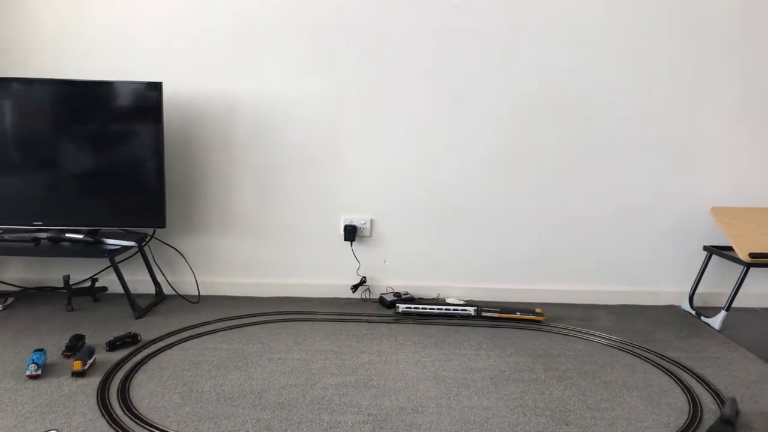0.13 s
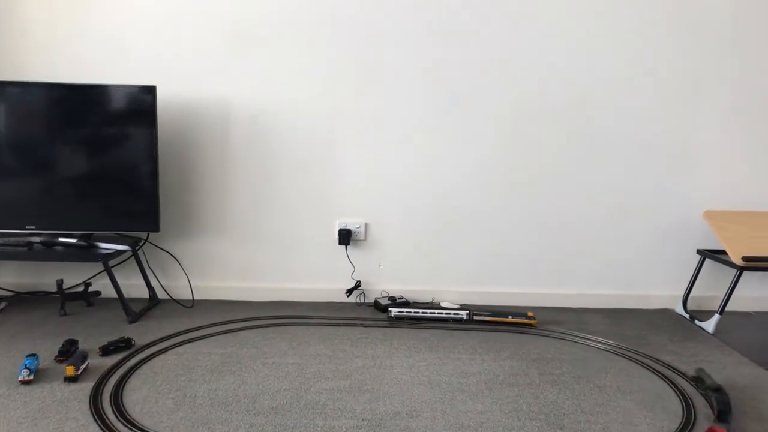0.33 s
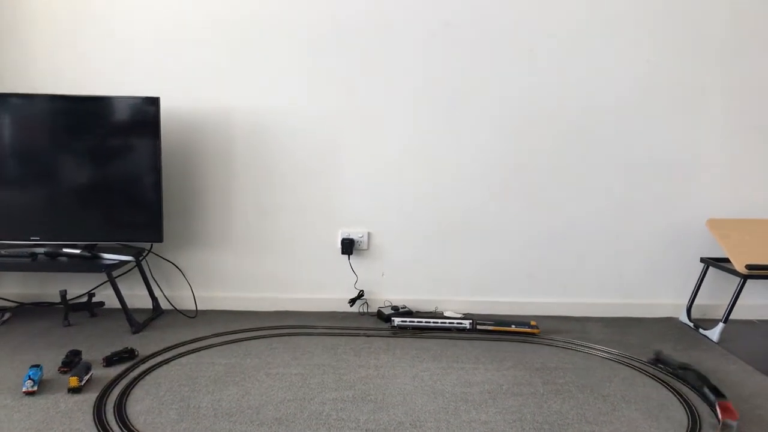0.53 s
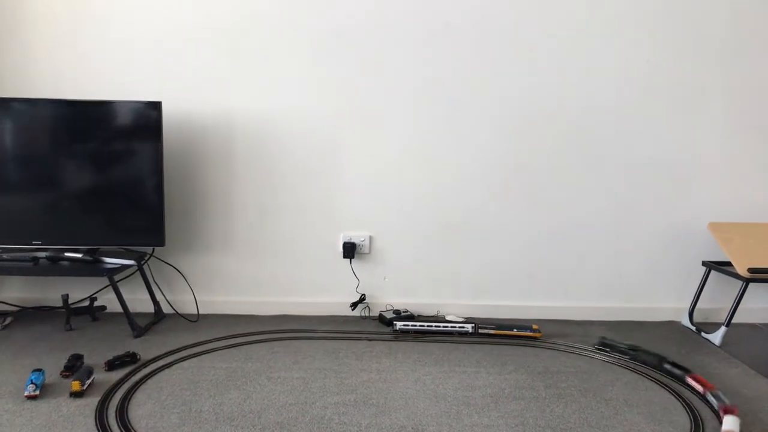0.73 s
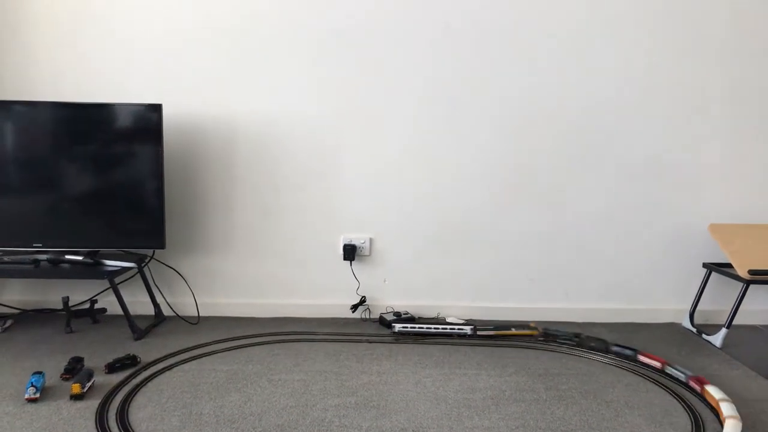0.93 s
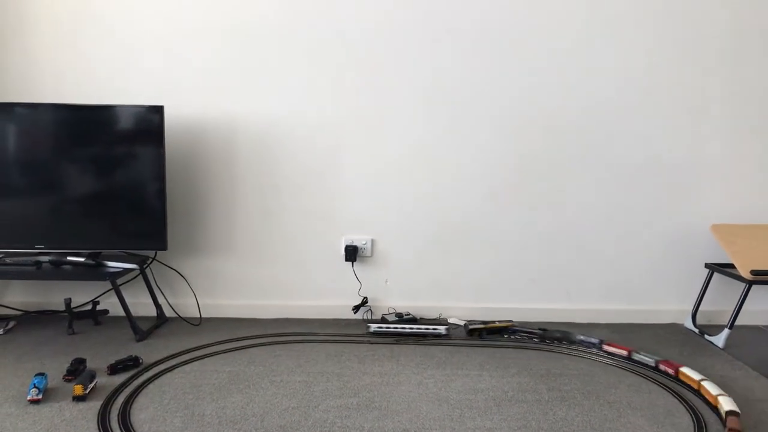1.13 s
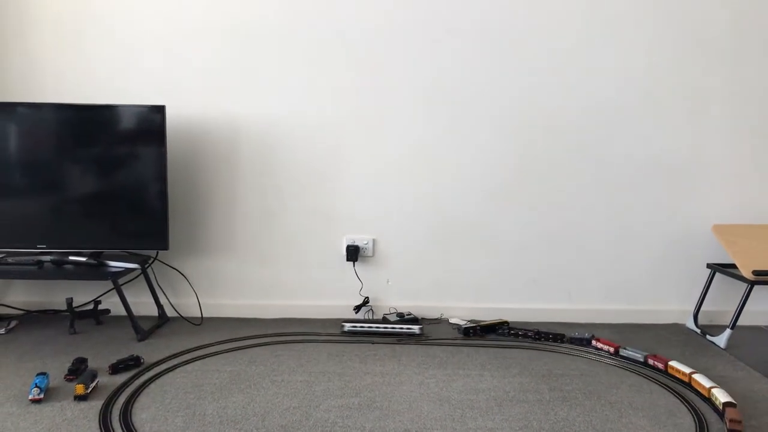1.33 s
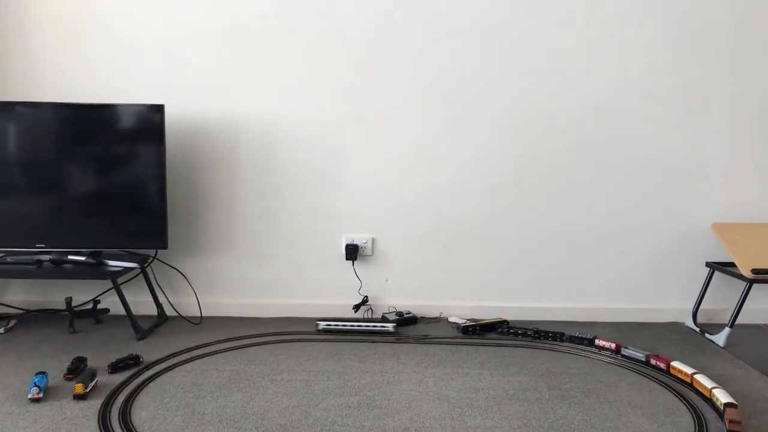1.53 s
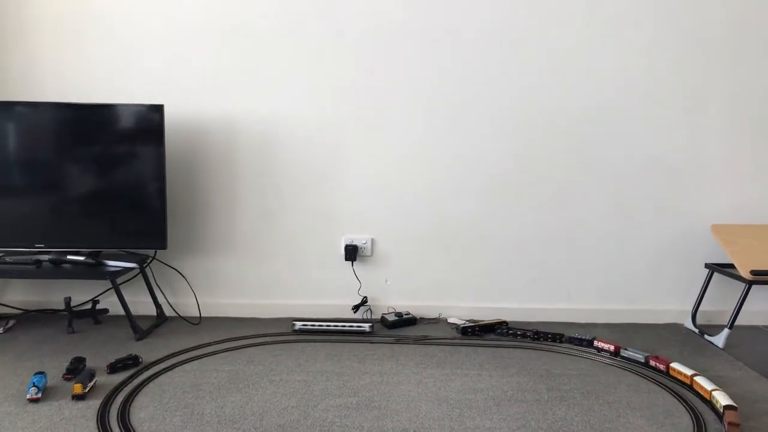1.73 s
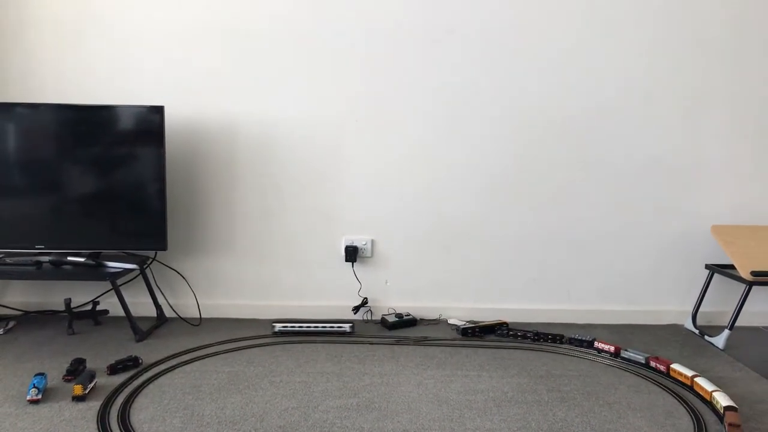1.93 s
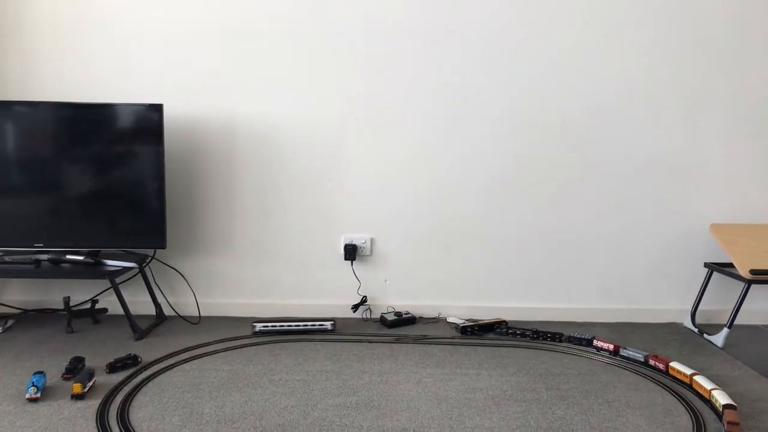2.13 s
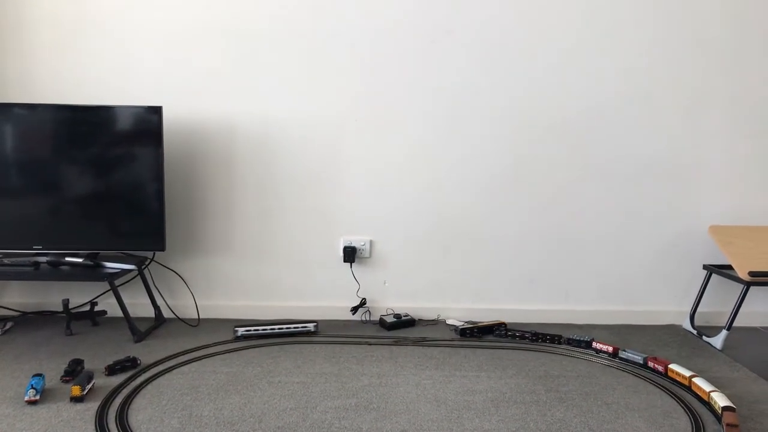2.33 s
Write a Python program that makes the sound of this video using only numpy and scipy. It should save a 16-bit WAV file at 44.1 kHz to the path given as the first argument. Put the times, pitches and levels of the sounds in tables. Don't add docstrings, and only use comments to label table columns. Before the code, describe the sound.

Toy electric train whirrs along plastic track, then crashes into parked wagons and clatters to a stop

```python
import sys
import numpy as np
from scipy import signal
from scipy.fft import rfft, irfft
from scipy.io import wavfile
from scipy.ndimage import uniform_filter1d

SR = 44100
rng = np.random.default_rng(int(sys.argv[2]) if len(sys.argv) > 2 else 0)


def generate_wav(signal):
    frames = np.transpose(np.atleast_2d(signal))
    scaled = np.clip(frames, -1, 1) * 32767
    pcm = np.round(scaled).astype(np.int16)
    wavfile.write(sys.argv[1], SR, pcm)


def invert_db(level):
    return 10 ** (np.asarray(level, dtype=float) / 20)


N = 105840

# frequency in Hz, density in dB per Hz.
HUM_COLOUR = [(30, -16), (60, 1), (97, 2.5), (290, -2.5), (420, -12.5), (650, -8.5), (1400, -20.5),
              (3000, -36)]
HUM_DB, HUM_FLICKER_DB = -59.5, 1.0
# frequency in Hz, density in dB per Hz.
HISS_COLOUR = [(1000, 1), (3000, -4.5), (5000, -9.5), (6500, -7), (8500, -1), (10500, -5), (15500, -17)]
HISS_DB, HISS_FADE_DB_PER_S = -64.5, -5

# start in seconds, level in dB, length in seconds.
SETTLE_EVENTS = [
    (1.571, -56.5, 0.022),
    (1.621, -65, 0.013),
    (1.65, -58.5, .018),
    (1.745, -67, .015),
    (1.9, -61, .01),
    (2.13, -66, 0.023),
    (2.232, -58, 0.013),
    (2.268, -79, 0.0097),
]
# frequency in Hz, density in dB per Hz.
SETTLE_COLOUR = [(500, 5), (2000, 1.5), (4500, -16), (8500, 3.5), (11000, -1), (15500, -6)]

# time in seconds, level in dB.
SCRAPE_LEVEL = [
    (.928, -72),
    (.935, -31),
    (1.0, -36.5),
    (1.1, -36.5),
    (1.17, -42.5),
    (1.24, -37),
    (1.31, -47),
    (1.42, -49),
    (1.52, -63.5),
    (1.62, -59),
]
# frequency in Hz, density in dB per Hz.
SCRAPE_COLOUR = [(120, -40.5), (200, -11), (702, -5.5), (783, -14.5), (992, -0.5), (1280, -6), (5390, -8.5),
                 (8350, -5), (15500, -23)]
RATTLE_PER_S, RATTLE_SPREAD_DB = 5000, 4.5

# start in seconds, peak in dB, length in seconds.
CRACK_EVENTS = [(0.9284, -14, 0.0061), (0.9404, -13.5, 0.004), (0.951, -21, 0.0076), (0.977, -23, 0.0033),
                (1.005, -19, 0.0054), (1.025, -18, .005), (1.036, -25, 0.0036), (1.105, -35, .004),
                (1.194, -22.5, 0.0057), (1.206, -24, 0.0033), (1.215, -46, 0.0055), (1.228, -19, 0.0037),
                (1.248, -24, 0.002), (1.3224, -23.5, 0.0046), (1.331, -20, .004), (1.339, -24, 0.0049),
                (1.397, -29.5, .006)]
# frequency in Hz, density in dB per Hz.
CRACK_COLOUR = [(200, -63), (500, -11), (1200, -15), (2500, -7.5), (4000, -18.5), (6500, -5.5), (9200, 1),
                (15500, -16)]
CRACK_DB = -8.5

# start in seconds, peak in dB, shell pitch in Hz, second pitch in Hz.
KNOCK_EVENTS = [(0.9308, -31.5, 1020, 570), (.939, -26, 1028, 1527), (.946, -32.5, 1587, 560),
                (.978, -43, 930, 2400), (1.009, -33, 980, 644), (1.013, -33.5, 530, 1028),
                (1.035, -31, 1080, 1530), (1.060, -32.5, 1100, 820), (1.075, -30.5, 640, 705),
                (1.082, -29.5, 970, 1136), (1.11, -36.5, 868, 2800), (1.144, -37.5, 972, 720),
                (1.218, -37.5, 1740, 2680), (1.259, -38, 1470, 990), (1.275, -37, 1427, 1000),
                (1.298, -38.5, 2540, 1010), (1.313, -37.5, 930, 858), (1.395, -45.5, 3464, 2390),
                (1.41, -53, 3440, 2460), (1.441, -49, 3350, 2470), (1.58, -57.5, 3220, 1510),
                (1.599, -58, 3400, 2410), (2.229, -64, 2920, 1410)]
# frequency in Hz, gain in dB.
CLACK_COLOUR = [(150, -46), (450, -1), (700, 6), (1500, 9), (2500, 13), (5000, -24), (9000, -30)]
SHELL_T60_S, CHATTER_S = 0.041, 0.0016
SECOND_PITCH_DB, CLACK_DB = -4, 0
THUD_HZ, THUD_DB, THUD_T60_S = 198, -16, 0.048

# time in seconds, level in dB.
ROLL_LEVEL = [
    (0, -38.5),
    (.2, -38.5),
    (.45, -39),
    (.7, -39),
    (.92, -40),
    (1.0, -37.5),
    (1.3, -42.5),
    (1.45, -55),
    (1.56, -94),
]
# frequency in Hz, density in dB per Hz.
ROLL_COLOUR = [(150, -15.5), (300, 1), (430, -2.5), (1500, -7), (2600, 1), (4500, -5.5), (8300, 0.5),
               (15500, -8.5)]
# frequency in Hz, width in Hz, level in dB.
BODY_MODES = [(340, 135, 8), (600, 20, -26), (640, 57, 0.5), (1240, 39, -35), (1282, 23, 1),
              (1870, 270, 8.5), (2320, 58, -46), (2320, 130, 13), (2540, 57, -4), (2720, 124, 8.5),
              (3135, 750, 6.5)]
BODY_DB, TICKS_PER_S, TICK_SPREAD_DB = -12.5, 9000, 1
WHEEL_HZ, WHEEL_DB = 7.1, 0

ROOM_LOW_T60_S, ROOM_TOP_T60_S, ROOM_DB, ROOM_GAP_S = .45, .4, -6, .005

# frequency in Hz, gain in dB.
CLOSED_COLOUR = [(1500, 0), (2700, -3.5), (4500, -0.5), (5700, 0.5), (6400, -11.5), (8400, -16),
                 (11000, -8.5), (15000, -10.5)]
OPENS_S = 0.215
# frequency in Hz, gain in dB.
PORT_COLOUR = [(5600, -1), (6600, 0.5), (7600, 3), (9400, 3), (10200, -1.5), (12000, 2.5)]
# centre in seconds, low edge in Hz, high edge in Hz, level in dB.
SPLIT_EVENTS = [
    (.27, 10600, 12900, -52),
    (.432, 6900, 8400, -48),
    (.432, 8900, 10200, -51),
    (.432, 12400, 13800, -56),
    (0.619, 7760, 8700, -47),
    (.618, 10200, 11700, -56),
    (.618, 14500, 15700, -60),
]
SPLIT_S = .046


def level(x, db):
    return x * invert_db(db) / np.sqrt(np.mean(x ** 2) + 1e-30)


def curve(rows):
    time_s, db = np.array(rows).T
    return invert_db(np.interp(np.arange(N) / SR, time_s, db, right=-140))


def colour(x, points):
    hz, db = np.array(points, float).T
    log_hz = np.log(np.arange(2049) * SR / 4096 + 1)
    cepstrum = irfft(np.interp(log_hz, np.log(hz), db) * np.log(10) / 20)
    cepstrum[1:2048] *= 2
    cepstrum[2049:] = 0
    impulse = irfft(np.exp(rfft(cepstrum)))
    return signal.fftconvolve(x, impulse)[:len(x)]


def ring(x, hz, t60_s):
    radius = np.exp(-np.log(1000) / (max(t60_s, .002) * SR))
    w = 2 * np.pi * hz / SR
    return signal.lfilter([np.sin(w)], [1, -2 * radius * np.cos(w), radius * radius], x)


def walk(rate_hz):
    hold = int(SR / rate_hz)
    steps = np.repeat(rng.standard_normal(N // hold + 1), hold)
    w = uniform_filter1d(uniform_filter1d(steps, hold), hold)[:N]
    return w / w.std()


def ticks(per_s, spread_db):
    chance, sign, draw = rng.random((3, N))
    size = np.minimum(-np.log(draw + 1e-9), 3.5)
    return (chance < per_s / SR) * np.sign(sign - .5) * invert_db(spread_db * size)


def burst(start_s, length_s, attack_s):
    t = np.maximum(np.arange(N) / SR - start_s, 0)
    return (1 - np.exp(-t / attack_s)) * np.exp(-t / max(length_s, .001))


def air():
    hum = colour(rng.standard_normal(N), HUM_COLOUR + [(8000, -83)])
    flickering = 0
    for hz in 20 * 2. ** np.arange(9):
        octave = signal.butter(2, [hz, 2 * hz], "band", fs=SR, output="sos")
        flickering = flickering + signal.sosfilt(octave, hum) * invert_db(HUM_FLICKER_DB * walk(9))
    hiss = level(colour(rng.standard_normal(N), [(300, -27)] + HISS_COLOUR), HISS_DB)
    fade = invert_db(HISS_FADE_DB_PER_S * (np.arange(N) / SR - 2))
    return level(flickering, HUM_DB) + hiss * fade


def settling():
    env = sum(invert_db(db) * burst(s, length_s, 0.0059) for s, db, length_s in SETTLE_EVENTS)
    return level(colour(ticks(5400, 4.3), SETTLE_COLOUR), 5.6) * env


def scraping():
    rattle = level(ticks(RATTLE_PER_S, RATTLE_SPREAD_DB), 0)
    rough = rattle + 0.96 * rng.standard_normal(N)
    coloured = level(colour(rough, [(50, -70)] + SCRAPE_COLOUR), 0)
    return coloured * invert_db(0.7 * walk(51.2)) * curve(SCRAPE_LEVEL)


def cracks():
    env = sum(invert_db(db) * burst(s, length_s, .0007) for s, db, length_s in CRACK_EVENTS)
    return level(colour(rng.standard_normal(N), CRACK_COLOUR), CRACK_DB) * env


def peak_one(x):
    return x / np.abs(x).max()


def soft_ring(x, hz, t60_s):
    return peak_one(ring(ring(x, hz, t60_s), hz, .005))


def knocks():
    out = np.zeros(N)
    t = np.arange(SR // 5) / SR
    thin = signal.butter(4, 450, "high", fs=SR, output="sos")
    for start_s, db, shell_hz, second_hz in KNOCK_EVENTS:
        chatter = rng.standard_normal(len(t)) * np.exp(-t / CHATTER_S)
        shell = soft_ring(chatter, shell_hz, SHELL_T60_S)
        second = invert_db(SECOND_PITCH_DB) * soft_ring(chatter, second_hz, SHELL_T60_S)
        clack = invert_db(CLACK_DB) * peak_one(colour(chatter, CLACK_COLOUR))
        thud = invert_db(THUD_DB) * soft_ring(chatter, THUD_HZ, THUD_T60_S)
        knock = signal.sosfilt(thin, shell + second + clack) + thud
        i = int(start_s * SR)
        out[i:i + len(knock)] += invert_db(db) * knock[:N - i]
    return out


def rolling():
    gear = ticks(TICKS_PER_S, TICK_SPREAD_DB)
    body = 0
    for hz, width_hz, db in BODY_MODES:
        mode = level(ring(gear, hz, 3.35 / width_hz), db)
        body = body + mode * invert_db(2.0 * walk(13.1))
    wheel = WHEEL_DB * np.sin(2 * np.pi * WHEEL_HZ * np.arange(N) / SR)
    throb = invert_db(wheel + 0.36 * walk(38.6))
    broad = level(colour(gear, [(50, -30)] + ROLL_COLOUR), 0)
    return level(broad + level(body, BODY_DB), 0) * throb * curve(ROLL_LEVEL)


def room(x):
    t = np.arange(SR // 2) / SR
    noise = rng.standard_normal(len(t))
    lows = signal.sosfilt(signal.butter(1, 3000, fs=SR, output="sos"), noise)
    tail = lows * invert_db(-60 * t / ROOM_LOW_T60_S) + (noise - lows) * invert_db(-60 * t / ROOM_TOP_T60_S)
    tail = tail * (t > ROOM_GAP_S)
    return x + invert_db(ROOM_DB) * signal.fftconvolve(x, tail / np.sqrt(np.sum(tail ** 2)))[:N]


def scene():
    crash = scraping() + cracks() + knocks() + settling()
    mono = air() + room(crash) + rolling()
    return np.array([mono, mono])


def splits():
    t = np.arange(N) / SR
    out = 0
    for centre_s, low_hz, high_hz, db in SPLIT_EVENTS:
        sos = signal.butter(6, [low_hz, high_hz], "band", fs=SR, output="sos")
        band = level(signal.sosfilt(sos, rng.standard_normal(N)), db)
        out = out + band * np.cos(np.pi * np.clip((t - centre_s) / SPLIT_S, -.5, .5))
    return out


def band_limit(x):
    return signal.sosfilt(signal.butter(12, 15910, fs=SR, output="sos"), x)


def record(dry):
    opened = np.clip((np.arange(N) / SR - OPENS_S) / .004, 0, 1)
    bass_cut = signal.butter(2, 55, "high", fs=SR, output="sos")
    x = colour(signal.sosfilt(bass_cut, dry[0]), PORT_COLOUR)
    x = x * opened + colour(x, CLOSED_COLOUR) * (1 - opened)
    x = signal.sosfilt(signal.ellip(8, .2, 60, 15750, fs=SR, output="sos"), x)
    side = splits()
    return band_limit(np.array([x + side, x - side]))


dry = scene()
out = record(dry)
generate_wav(out)
```